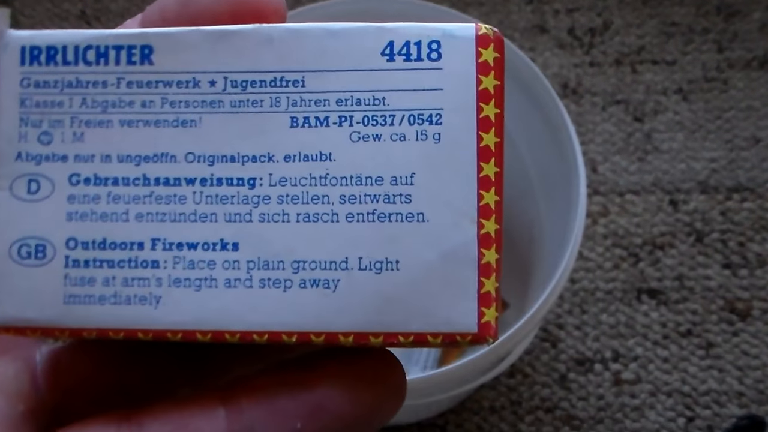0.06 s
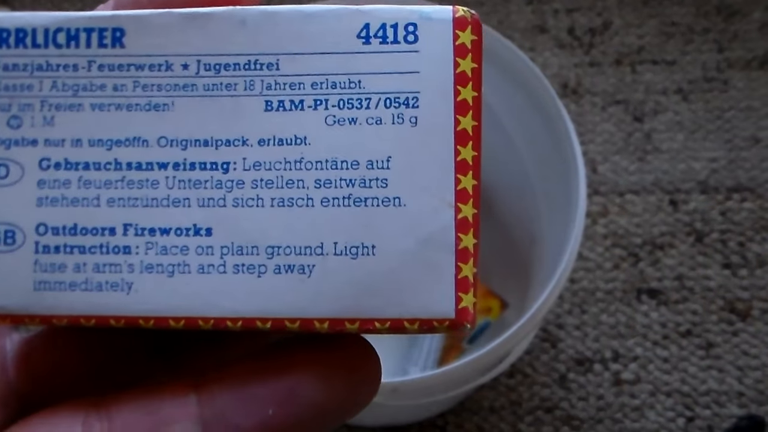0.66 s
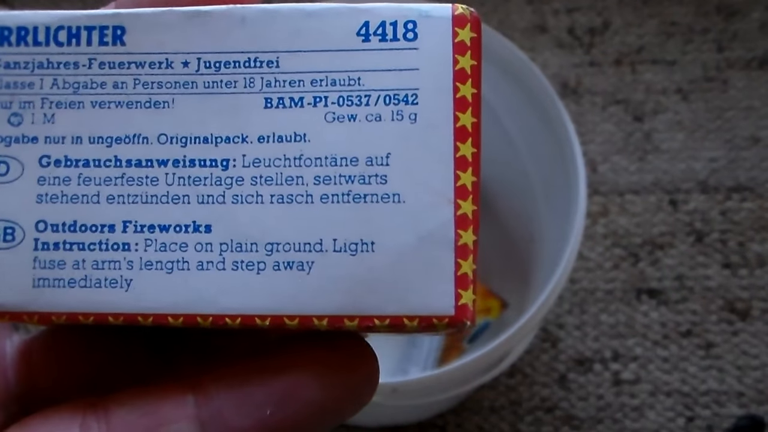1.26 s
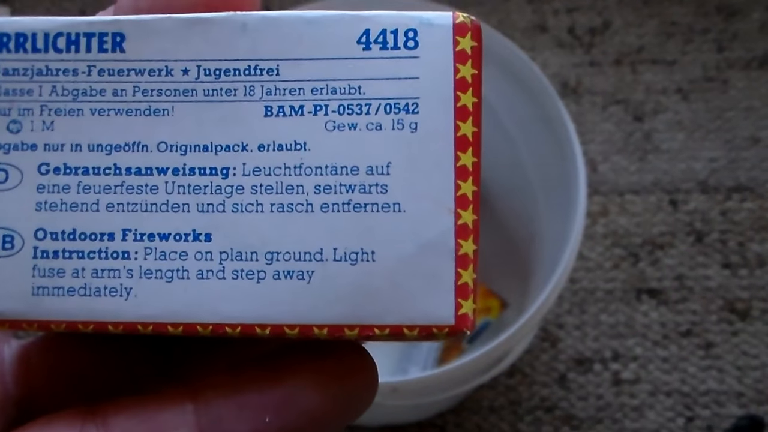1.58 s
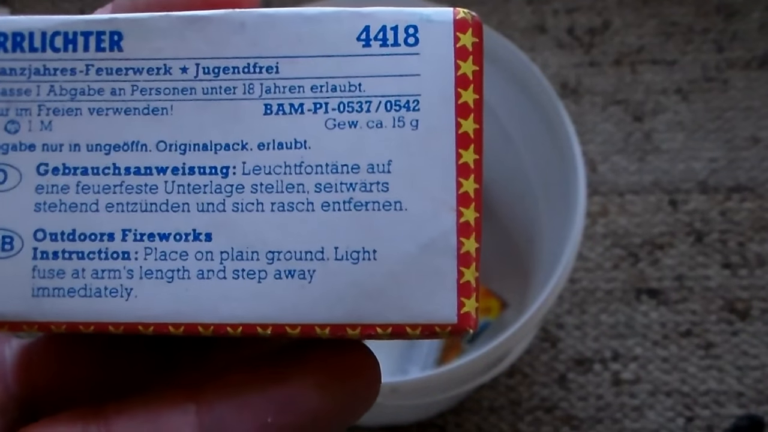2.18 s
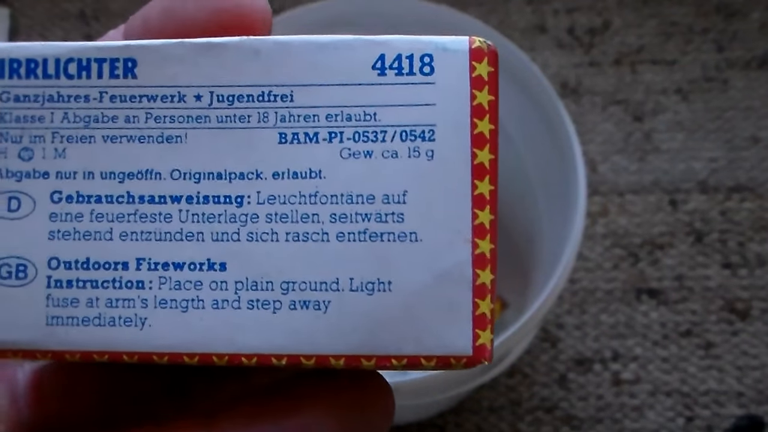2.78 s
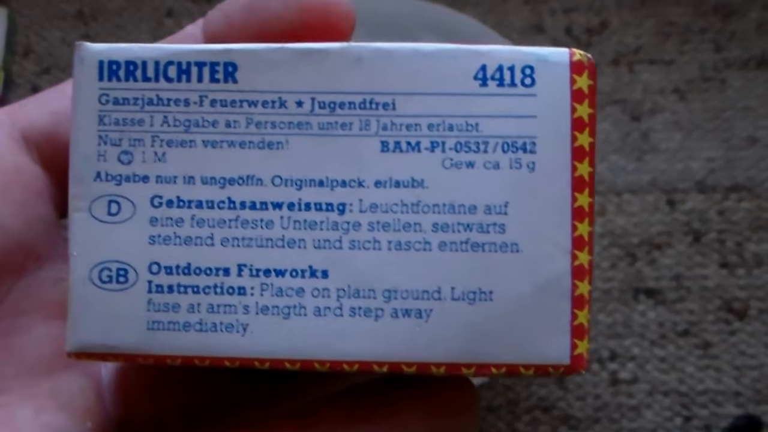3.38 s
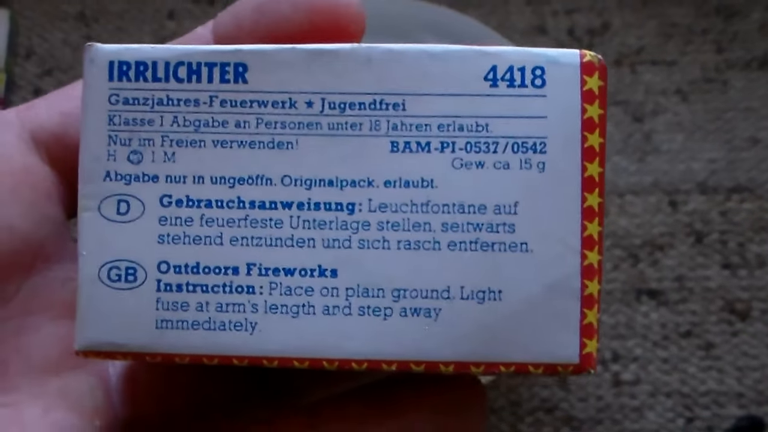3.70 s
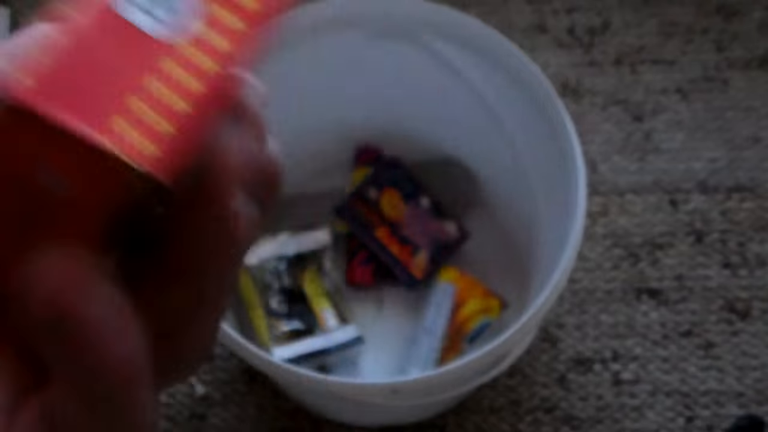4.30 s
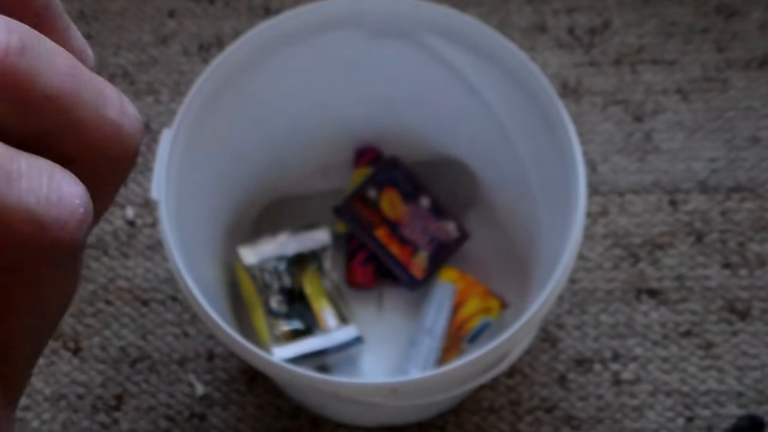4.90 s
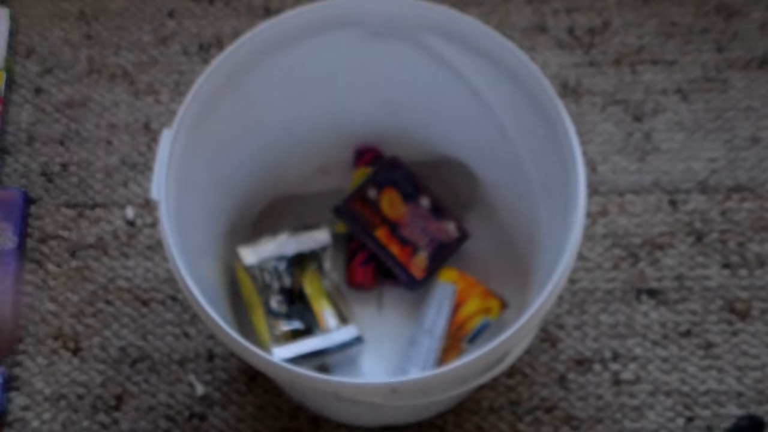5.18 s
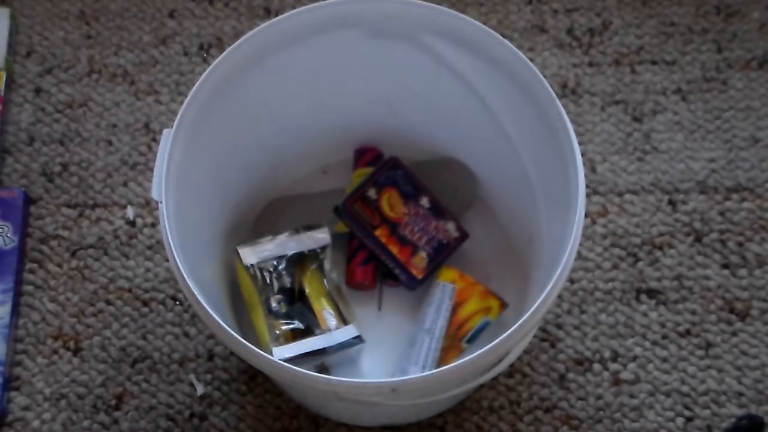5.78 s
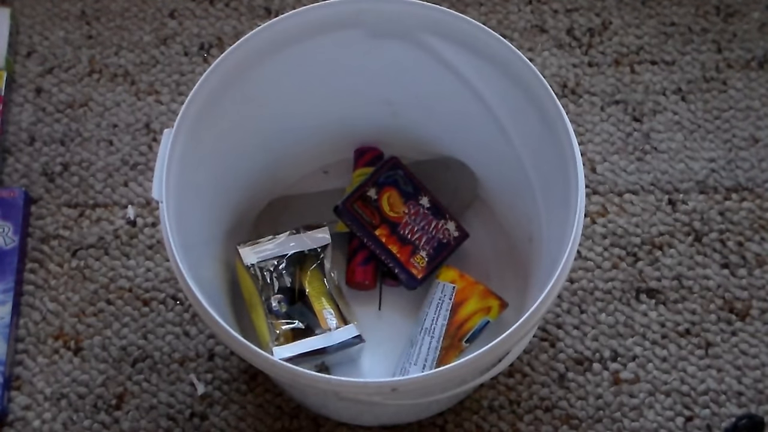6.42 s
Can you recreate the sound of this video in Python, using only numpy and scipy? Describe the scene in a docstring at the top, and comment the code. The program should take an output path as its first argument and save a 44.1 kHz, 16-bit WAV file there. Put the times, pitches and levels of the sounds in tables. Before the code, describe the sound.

Faint hiss and focus motor buzz, then a small cardboard box taps and scrapes and packets clatter and rustle in a plastic bucket.

```python
"""A camera's focus motor buzzes faintly in short steps over microphone hiss and a low hum.
In a quiet carpeted room, a small cardboard box ticks as fingers hold it. It is then put down among
other packets at a plastic bucket: first taps and scrapes, then duller clatter and rustling.
Each knock makes the card or the bucket ring briefly; each scrape is many tiny catches and slips."""
import sys
import numpy as np
from scipy import signal
from scipy.fft import rfft, irfft
from scipy.io import wavfile
from scipy.ndimage import uniform_filter1d

SR = 44100
rng = np.random.default_rng(int(sys.argv[2]) if len(sys.argv) > 2 else 0)


def dump(signal):
    """Clip the signal to [-1, 1] and save it as 16-bit WAV at the path in sys.argv[1]."""
    limited = np.clip(np.atleast_2d(signal).T, -1, 1)
    pcm = np.round(limited * 32767).astype(np.int16)
    wavfile.write(sys.argv[1], SR, pcm)


N = 293265

# the pitches at which the cardboard box rings: pitch_hz, width_hz, level_db
BOX_RESONANCES = [(339, 43, -8), (474, 90, -10), (1060, 100, -8.5), (1234, 26, 6.5), (1490, 430, -9),
                  (2456, 170, 6.5), (2770, 410, 5), (3416, 290, -3), (4120, 160, -11)]


def amp(db):
    """Turns decibels into a number to multiply a sound by."""
    return 10 ** (np.asarray(db) / 20)


def unit_level(x):
    """Scales a signal to an average level (rms) of 1."""
    return x / np.sqrt(np.mean(x ** 2) + 1e-20)


def look_up(points, hz):
    """Reads a table's value at any pitch, blending between its rows."""
    pitches, values = np.transpose(points)
    return np.interp(np.log(hz + 1), np.log(pitches + 1), values)


def add(mix, start_s, sound):
    """Mixes a sound in at the given time."""
    part = mix[max(round(start_s * SR), 0):][:len(sound)]
    part += sound[:len(part)]


def colour(x, spectrum):
    """Turns each pitch up or down as a table says, then sets the average level to 1."""
    gains = amp(look_up(spectrum, np.fft.rfftfreq(N, 1 / SR)))
    return unit_level(irfft(rfft(x) * gains, N))


def ring(x, resonances, direct_db):
    """An object rings at its own pitches, while some of the sound passes straight through."""
    out = amp(direct_db) * x
    for hz, width_hz, db in resonances:
        out = out + amp(db) * signal.lfilter(*signal.iirpeak(hz, hz / width_hz, SR), x)
    return out


def fuzzy_tone(hz, width_hz):
    """Noise squeezed around one pitch: the narrower it is, the more it sounds like a note."""
    peak = signal.iirpeak(hz, hz / width_hz, SR)
    return unit_level(signal.lfilter(*peak, signal.lfilter(*peak, rng.standard_normal(N))))


def stereo(middle, side, likeness):
    """Makes left and right from two unrelated sounds; a likeness of 1 is the same in both ears."""
    same = np.clip(look_up(likeness, np.fft.rfftfreq(N, 1 / SR)), -.9, 1)
    side = irfft(rfft(side) * np.sqrt((1 - same) / (1 + same)), N)
    return np.array([middle + side, middle - side])


def background():
    """Steady room rumble, microphone hiss and a low hum."""
    # the tone of the rumble and hiss: pitch_hz, level_db
    noise_spectrum = [(5, 28.5), (20, 26.5), (45, 19), (70, 18), (110, 15.5), (200, 11.5), (400, 8.5),
                      (1000, 3.5), (2500, 0.5), (6000, -2), (14000, -4)]
    # how alike that noise is in both ears: pitch_hz, likeness (0 to 1)
    noise_likeness = [(20, 0.3), (60, 0.09), (150, 0.099), (400, 0.038), (1500, 0.029), (4000, 0),
                      (14000, 0)]
    # the steady tones of the hum: pitch_hz, level_db
    hum_tones = [(26.2, -60), (50, -66.5), (100, -80)]
    t = np.arange(N) / SR
    middle, side = (colour(rng.standard_normal(N), noise_spectrum) for _ in range(2))
    hum = sum(amp(db) * np.sqrt(2) * np.sin(2 * np.pi * (hz * t + rng.random())) for hz, db in hum_tones)
    return amp(-59) * stereo(middle, side, noise_likeness) + hum


def rumble():
    """A soft low rumble swells under the last rustling."""
    peak_s, swell_s = 6.38, 0.15
    t = np.arange(N) / SR
    low_noise = colour(rng.standard_normal(N), [(8, 10), (25, 2), (80, -14), (130, -24), (400, -54)])
    return amp(-46.5) * low_noise * np.exp(-((t - peak_s) / swell_s) ** 2)


def focus_motor():
    """Each step of the lens is a brief whine; stronger runs of steps rasp more in the gears."""
    # the lens hunts for focus in runs of even steps: start_s, end_s, interval_s, level_db
    focus_runs = [(0.022, .41, 0.0718, -65.5), (.675, .97, .125, -66.5), (1.048, 1.33, 0.12, -70),
                  (1.795, 2.05, .178, -74), (2.855, 2.9, 0.072, -68.5), (3.48, 4.24, 0.0803, -68.5),
                  (4.803, 5.23, 0.078, -67)]
    # the tones in the motor's whine: pitch_hz, width_hz, level_db
    motor_tones = [(1608, 67, -6.5), (2430, 126, -6), (3210, 110, -7.5), (4000, 180, -6.5), (4820, 68, -5)]
    step_share, step_spread_db = 0.33, 2  # a step's half-length as a share of the interval; its scatter
    gears_from_db, gears_growth = -65, 0.38  # the rasp gains on the whine above this level, in dB per dB
    t = np.arange(N) / SR
    whine_level, gears_level = np.zeros((2, N))
    for start_s, end_s, interval_s, db in focus_runs:
        for step_s in np.arange(start_s, end_s, interval_s):
            from_peak = np.minimum(abs(t - step_s) / (step_share * interval_s), 6)
            step = amp(db + step_spread_db * rng.standard_normal()) * np.exp(-from_peak ** 2)
            whine_level += step
            gears_level += step * amp(gears_growth * (db - gears_from_db))
    whine = sum(amp(db) * fuzzy_tone(hz, width_hz) for hz, width_hz, db in motor_tones)
    gears = amp(-6) * fuzzy_tone(hz=3220, width_hz=180) + amp(-4) * fuzzy_tone(hz=3180, width_hz=2300)
    return amp(-6) * whine * whine_level + gears * gears_level


def room_echo(x, first_echo_s):
    """The room sends back many small echoes; low pitches linger longest."""
    # how long the echo takes to fade by 60 dB: pitch_hz, fade_s
    fade_times = [(200, 0.5), (660, 0.3), (1200, 0.3), (2500, 0.27), (4500, 0.23), (12000, 0.28)]
    echoes = rng.choice([-1., 1.], SR // 2) * (rng.random(SR // 2) < .08)
    echoes[:int(first_echo_s * SR)] = 0
    hz, t, bands = signal.stft(echoes, SR, nperseg=256)
    fade = amp(-60 * t / look_up(fade_times, hz)[:, None])
    tail = signal.istft(bands * fade, SR, nperseg=256)[1]
    return signal.fftconvolve(x, tail / np.linalg.norm(tail))[:N]


def friction(slips_per_s, spread_db, smooth_gain):
    """Fibres catch and let go: many tiny slips of uneven size over a smooth rub."""
    slips = (rng.random(N) < slips_per_s / SR) * rng.choice([-1, 1], N)
    sizes = amp(spread_db * np.minimum(rng.exponential(1, N), 3))
    return unit_level(slips * sizes) + smooth_gain * rng.standard_normal(N)


def sliding():
    """Card and wrappers slide: the box scrapes hollowly, its edges rasp and its surface hisses."""
    # strokes (face down scrapes, edge on hisses): middle_s, length_s, level_db, flatness_db
    strokes = [(1.681, .032, -66.5, -7), (4.291, 0.053, -49, 2.5), (4.314, .032, -40.5, -18),
               (4.35, 0.043, -48.5, 2.5), (4.442, 0.065, -51, 1), (4.52, 0.11, -44, -8),
               (4.57, 0.037, -42.5, 0.5), (4.636, 0.066, -41.5, 4.5), (5.282, 0.043, -55, 7),
               (5.467, 0.042, -52, -2), (5.543, .11, -57, -4), (5.755, 0.041, -40.5, -0.5),
               (5.826, .084, -58, 2), (5.94, 0.098, -53.5, -3), (6.007, 0.024, -42.5, -1),
               (6.072, .11, -51.5, -1), (6.184, 0.1, -50, -4), (6.262, 0.048, -45.5, -10.5),
               (6.39, .3, -55, 4)]
    # the tone of the hollow scrape: pitch_hz, level_db
    scrape_spectrum = [(60, -19), (150, -6), (320, -4.5), (700, 2.5), (1400, -2), (1900, -5.5), (2600, -26),
                       (5000, -26)]
    # the tone of the rasping edges: pitch_hz, level_db
    rasp_spectrum = [(900, -64), (1700, 6), (2400, -3.5), (3300, -0.5), (4400, 1), (5400, -28), (9000, -34)]
    # the tone of the hissing surface: pitch_hz, level_db
    hiss_spectrum = [(1500, -25), (3500, -6), (5000, 2), (6500, -2), (8000, -5), (10000, -3.5), (14000, -8)]
    firm_stroke_db, firm_hiss_db = -39.5, -48.5
    hiss_per_level, hiss_per_flatness = 0.59, -0.43  # dB per dB
    far_from_s, far_hiss_db = 5.6, -2.5  # once down, the box is farther away and hisses less
    t = np.arange(N) / SR
    power = np.zeros((3, N))  # scrape, rasp, hiss
    for middle_s, length_s, db, flatness_db in strokes:
        from_middle = np.minimum(abs(2 * (t - middle_s) / length_s), 4)
        steepness = np.where(t < middle_s, 6, 3)  # bites quickly, fades more gently
        stroke = np.exp(-np.minimum(from_middle ** steepness, 50))
        hiss_db = firm_hiss_db + hiss_per_level * (db - firm_stroke_db) + hiss_per_flatness * flatness_db
        hiss_db += far_hiss_db * (middle_s > far_from_s)
        power += amp([db + flatness_db, db, hiss_db])[:, None] ** 2 * stroke
    # the contact sticks and slips, so the grit comes in clumps a few milliseconds long
    wobble = unit_level(uniform_filter1d(rng.standard_normal(N), size=200))
    grip = unit_level(amp(2.5 * wobble))
    slips = grip * friction(slips_per_s=1200, spread_db=3, smooth_gain=0.82)
    body = ring(slips, BOX_RESONANCES, direct_db=-2)
    scrape = colour(body, scrape_spectrum)
    rasp = colour(body, rasp_spectrum)
    hiss = colour(np.sqrt(grip) * rng.standard_normal(N), hiss_spectrum)
    return amp(-2) * (np.array([scrape, rasp, hiss]) * np.sqrt(power)).sum(axis=0)


def with_bounces(hits):
    """Every hit bounces once, lighter and duller; more weight gives a stronger bounce."""
    delay_s, lighter_db, duller_db = 0.012, -10.5, -13
    bounces = [(s + delay_s, hz, db + weight_db + lighter_db, 0, min(hard_db, 0) + duller_db, chatter_s)
               for s, hz, db, weight_db, hard_db, chatter_s in hits]
    return list(hits) + bounces


def knocks(hits, resonances, direct_db, panel_db, panel_sharpness, snap, rise_s, edge_db):
    """Each hit is a snap and a short chatter that ring the struck panel and the body behind it."""
    # the four parts of a hit (thud, knock, clack, edge): low_hz, high_hz, filter_order
    bands = [(240, 620, 2), (780, 1800, 3), (2300, 4500, 3), (4800, 14400, 5)]
    filters = [signal.butter(order, (low, high), "band", fs=SR, output="sos")
               for low, high, order in bands]
    soft_card = signal.butter(1, 6500, fs=SR)  # rounds off the highest treble
    out, t = np.zeros(N), np.arange(4096) / SR
    for start_s, panel_hz, level_db, weight_db, hardness_db, chatter_s in hits:
        fade = amp(-60 * t / max(chatter_s, 1e-3))
        force = rng.standard_normal(len(t)) * fade * (1 - np.exp(-t / rise_s))
        force[0] += snap
        panel = (panel_hz, panel_hz / panel_sharpness, panel_db)
        body = ring(force, list(resonances) + [panel], direct_db)
        body = signal.lfilter(*soft_card, body)
        # a flat landing (weight) adds thud; a corner (hardness) adds clack and edge
        for band_filter, db in zip(filters, (weight_db, 0, hardness_db, hardness_db + edge_db)):
            part = signal.sosfilt(band_filter, body)
            part *= np.sqrt(SR / 100) / np.linalg.norm(part)  # as much energy as 10 ms at level 1
            add(out, start_s, amp(level_db + db) * part)
    return out


def box_handling():
    """The box ticks and taps close by; the clatter rings the bucket and fills more of the room."""
    # the held box ticks: start_s, pitch_hz, level_db, weight_db, hardness_db, chatter_s
    tick_hits = [(1.392, 2700, -63, -8, 12, 0.0087), (1.658, 3520, -56.5, -20, 7.5, 0.02),
                 (3.392, 2730, -70, -3, 12.5, 0.028)]
    # the box taps its neighbours: start_s, pitch_hz, level_db, weight_db, hardness_db, chatter_s
    tap_hits = [(4.174, 1790, -60.5, -9, -7, 0.009), (4.199, 860, -58, -5, -5, 0.028),
                (4.265, 820, -56, 5, 5.5, .008), (4.277, 1130, -40, -4, -19, 0.015),
                (4.296, 1570, -42.5, -23, -2, 0.017), (4.338, 1330, -46, 1.5, -14, 0.018),
                (4.422, 1370, -44, -6.5, -10, 0.017), (4.429, 1272, -38.5, -18, -4, .009),
                (4.484, 1450, -36, -7.5, -20, 0.036), (4.5015, 926, -28.5, -6, -5, 0.018),
                (4.552, 1390, -42, -7, 0, 0.015), (4.56, 1480, -45, -13, -14, 0.02),
                (4.604, 1430, -34.5, -9.5, -6, 0.0069), (4.621, 1840, -50, -16, -1, 0.0099),
                (4.635, 1730, -53.5, -15, 15, .01), (4.6555, 1420, -35, 2, -1.5, 0.024),
                (5.273, 1230, -35.5, -22, -19, .006), (5.289, 1210, -40.5, -11.5, -3, .012),
                (5.447, 1890, -47.5, -13, -10, 0.0022)]
    # packets tumble and settle: start_s, pitch_hz, level_db, weight_db, hardness_db, chatter_s
    clatter_hits = [(5.729, 890, -38.5, -2.5, -1, 0.059), (5.744, 860, -32, -3, -9, .006),
                    (5.751, 1120, -39, -24, 3, 0.032), (5.766, 1040, -36, -15, -4.5, 0.0076),
                    (5.798, 1044, -44.5, -14, -6, 0.01), (5.829, 740, -46.5, -5, -19, 0.01),
                    (5.933, 935, -45.5, -19, -3, 0.064), (5.979, 970, -42.5, -2, -18, .02),
                    (5.998, 1560, -38.5, 2, -5, 0.017), (6.006, 1825, -29.5, -21, -4.5, 0.027),
                    (6.018, 1220, -30.5, -5, -16, .023), (6.098, 970, -35.5, -5, -18, 0.0072),
                    (6.104, 940, -32.5, -8, -19, 0.063), (6.283, 1230, -43.5, -27, -8, 0.0094),
                    (6.326, 1254, -36.5, -10.5, -15, 0.053), (6.356, 1220, -38, -16, -15, .028),
                    (6.405, 1635, -38.5, -6, -7, 0.04), (6.446, 1560, -42.5, -4, -11, 0.013),
                    (6.47, 1380, -42.5, -15, -12, 0.012), (6.483, 1360, -42, -6.5, -25, .05)]
    # the pitches at which the box's tight flap rings: pitch_hz, width_hz, level_db
    flap_resonances = [(1080, 104, 26.5), (3600, 220, 0.5), (4280, 540, -0.5), (5640, 500, -4),
                       (6860, 640, 4), (10300, 2000, -2)]
    # the pitches at which the plastic bucket rings: pitch_hz, width_hz, level_db
    bucket_resonances = [(340, 40, -4), (467, 160, -7.5), (640, 90, 4), (875, 87, -2.5), (1135, 70, 1),
                         (1422, 67, 2), (1810, 39, -7), (2325, 99, 8), (2522, 69, 10.5), (2810, 44, 8),
                         (3700, 150, -19)]
    ticks = amp(1) * knocks(tick_hits, flap_resonances, direct_db=-9, panel_db=3,
                            panel_sharpness=8.5, snap=3.5, rise_s=0.00021, edge_db=-6)
    taps = amp(0.63) * knocks(with_bounces(tap_hits), BOX_RESONANCES, direct_db=-1, panel_db=13.5,
                              panel_sharpness=5.6, snap=2.4, rise_s=0.00041, edge_db=-16)
    clatter = amp(-2.5) * knocks(with_bounces(clatter_hits), bucket_resonances, direct_db=-8,
                                 panel_db=10.5, panel_sharpness=23, snap=3.2, rise_s=0.0013, edge_db=-10)
    rustle = sliding()
    into_room = amp(-21) * ticks + amp(-12.5) * taps + amp(-8.5) * clatter + amp(-12) * rustle
    return ticks + taps + clatter + rustle + room_echo(into_room, first_echo_s=.006)


def scene():
    """The box sits near the middle, its treble spread wide, over the motor and the quiet room."""
    # how alike the box sounds in both ears: pitch_hz, likeness (0 to 1)
    box_likeness = [(200, 0.99), (1000, 0.99), (2500, 0.91), (4500, 0.68), (8000, 0), (14000, 0.07)]
    lean_left = amp([[.3], [-.3]])
    packets = stereo(box_handling(), box_handling(), box_likeness) * lean_left
    return packets + focus_motor() + rumble() + background()


def record(dry):
    """Cuts away the very highest treble."""
    cutoff_hz = 14350
    treble_cut = signal.firwin(511, cutoff_hz, window=("kaiser", 8), fs=SR)
    return signal.oaconvolve(dry, treble_cut[None], "same", axes=1)


dry = scene()
out = record(dry)
dump(out)
```